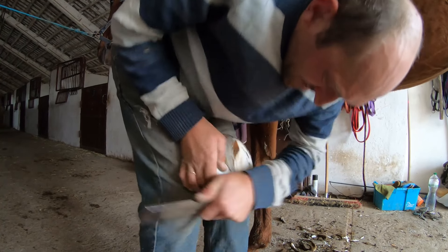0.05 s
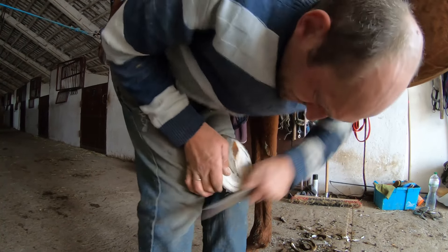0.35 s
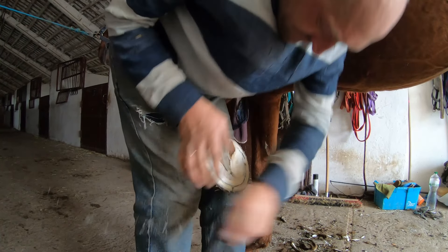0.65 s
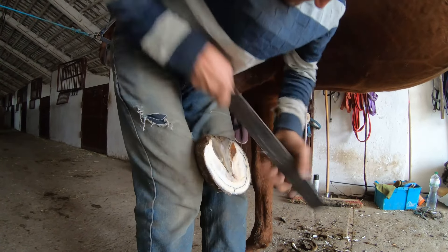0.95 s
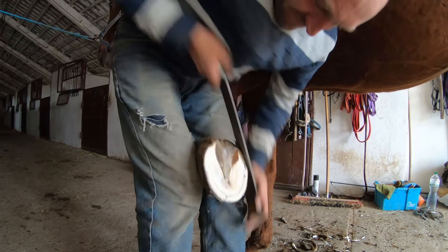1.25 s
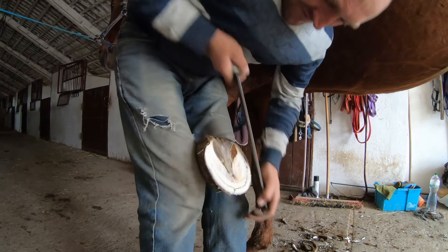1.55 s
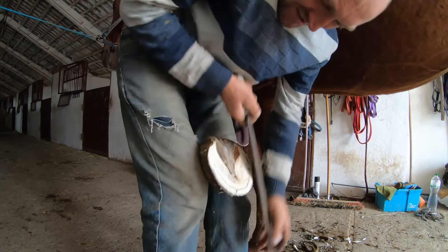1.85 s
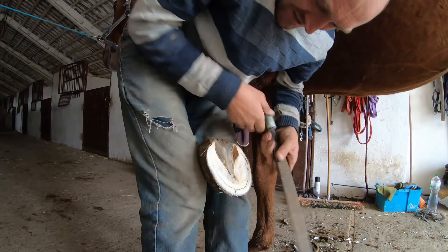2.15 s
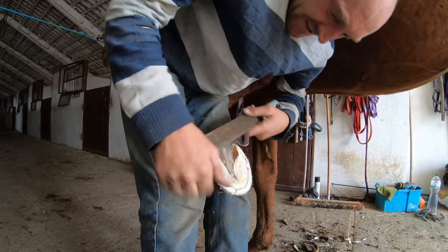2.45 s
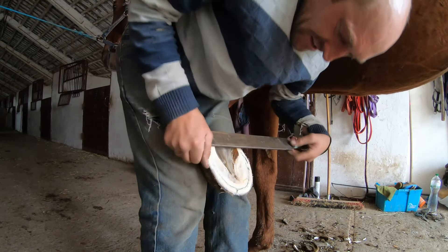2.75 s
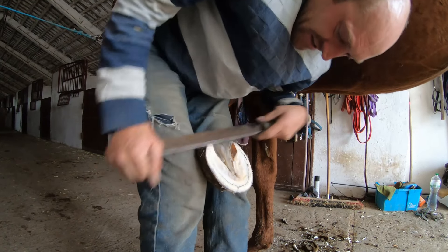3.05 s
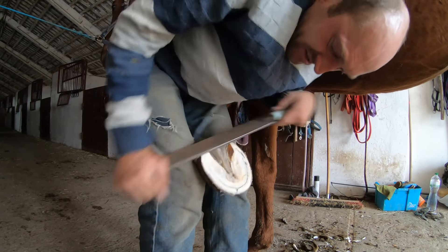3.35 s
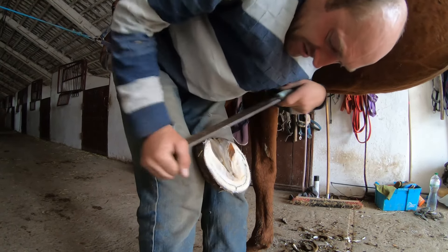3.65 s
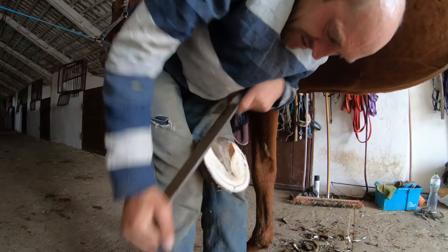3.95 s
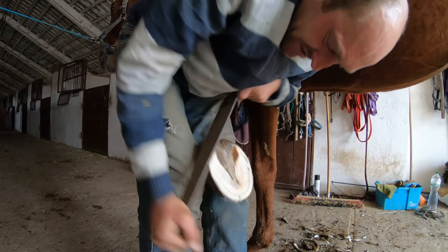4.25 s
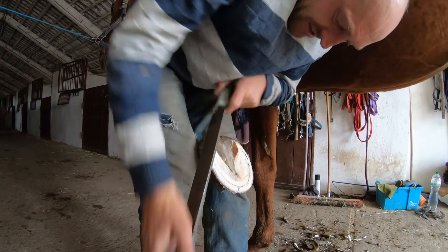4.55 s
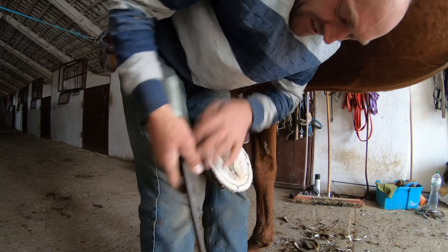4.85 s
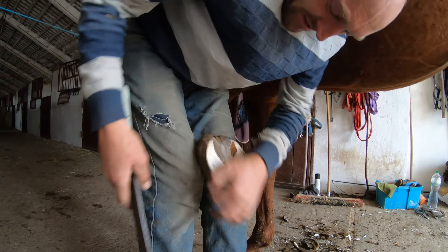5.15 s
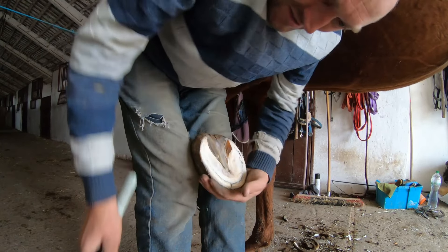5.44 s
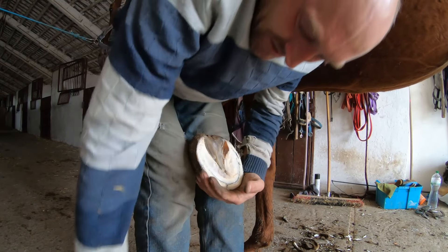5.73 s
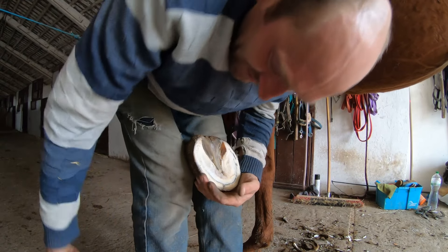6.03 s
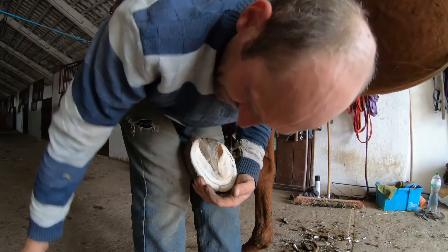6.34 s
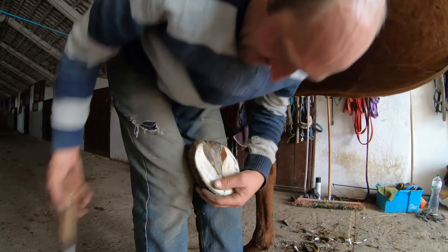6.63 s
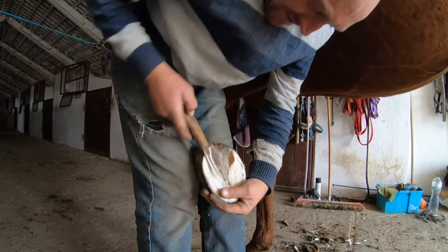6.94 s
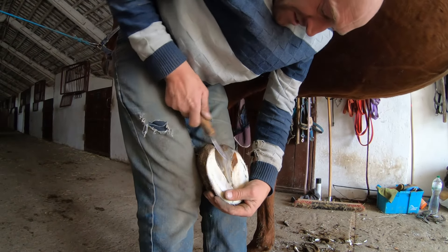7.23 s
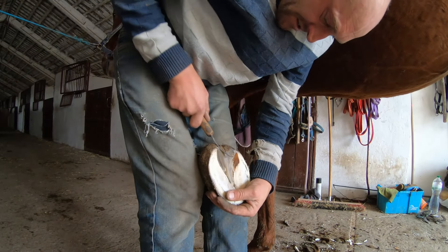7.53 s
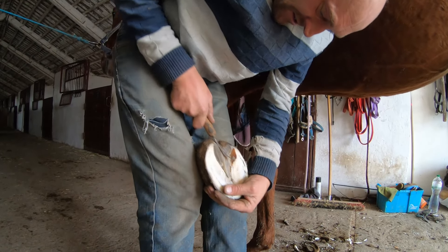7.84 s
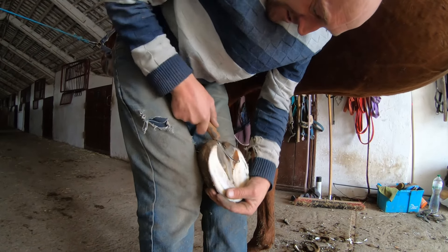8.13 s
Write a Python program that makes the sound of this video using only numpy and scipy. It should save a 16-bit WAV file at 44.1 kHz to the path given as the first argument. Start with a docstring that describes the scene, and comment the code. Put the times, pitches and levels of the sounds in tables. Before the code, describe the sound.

A steel rasp scrapes a horse's hoof in three quick, ringing, squeaky strokes, then in firmer, gritty ones with sharp hollow knocks. The strokes grow softer, with light glides between them. The rasp drops into a tool box with thuds and metallic clinks, a knife slides out, and faint paring cuts follow. The sounds are close, in a quiet stable with a short echo.

```python
"""Steel rasps a horse's hoof in a stable aisle: three one-handed strokes in which the blade sings and
snags, then six two-handed strokes that make the hoof drum, with light glides back between them.
The rasp clatters down among other tools, a hoof knife is drawn out and pares the sole in small cuts.
Teeth catch the horn and break off chips, which drive the resonances of blade and hoof;
hoof, box and tools ring in decaying modes when struck."""
import sys
import numpy as np
from scipy import signal
from scipy.fft import rfft, irfft
from scipy.io import wavfile
from scipy.ndimage import uniform_filter1d

SR = 44100
rng = np.random.default_rng(int(sys.argv[2]) if len(sys.argv) > 2 else 0)


def unload_audio(sound):
    """Save the sound as a 16-bit wav file, at the path given as the first command line argument."""
    columns = np.transpose(np.atleast_2d(sound))
    # keep every value between -1 and 1, then stretch to whole-number steps
    steps = np.round(np.clip(columns, -1, 1) * 32767)
    wavfile.write(sys.argv[1], SR, steps.astype(np.int16))


N = 361176
TIME = np.arange(N) / SR

# rasp blade resonances (frequency [Hz], width [Hz], level [dB])
RASP_MODES = [(903, 84, 4), (1366, 61, 17), (1766, 39, -0.5), (2260, 25, 3), (2932, 96, 4), (3638, 62, 0.5),
              (4240, 50, -7), (5110, 55, -2), (6100, 35, -10), (7120, 81, 0.5)]
# light contact on horn (frequency [Hz], level [dB])
RUB_SPECTRUM = [(200, -44), (600, -33), (1300, 3.5), (3700, -3.5), (8500, -9), (10300, -18.5),
                (13000, -24.5), (15500, -50)]
# stereo balance of blade, hoof and tool box (frequency [Hz], left minus right [dB])
BLADE_BALANCE = [(200, -.4), (1200, -7), (4500, -2), (8000, -7)]
HOOF_BALANCE = [(250, -.4), (1500, -3.2), (4200, 0), (8000, -7.5), (12000, -1.5)]
BOX_BALANCE = [(400, -.8), (1500, -2.5), (4500, 0), (8000, -4)]


def rasp():
    """Teeth chatter over the horn, shake the hoof and, held in one hand, set the blade singing."""
    # one-handed (start [s], swell [s], fade [s], scrape [dB], drum [dB], song [dB])
    loose_strokes = [(0.01, 0.07, 0.11, -37.5, -37.5, -34.5), (0.238, 0.046, 0.13, -40.5, -32.5, -31),
                     (0.424, 0.066, 0.12, -34.5, -37.5, -32.5)]
    # two-handed (start [s], swell [s], fade [s], scrape [dB], drum [dB], crunch [dB], chatter [Hz])
    firm_strokes = [(1.29, 0.094, 0.11, -34, -31.5, -34, 185.3),
                    (1.777, 0.052, 0.056, -29.5, -25.5, -32, 145.5),
                    (2.932, 0.1, 0.068, -34.5, -36, -36, 145.6), (3.396, 0.12, 0.06, -37, -40, -35, 122.4),
                    (3.785, 0.16, 0.061, -46.5, -39, -41.5, 235.4),
                    (4.369, 0.092, 0.087, -40, -47, -55, 269.4)]
    # scraping steel, drumming hoof, crunching horn (frequency [Hz], level [dB])
    scrape_spectrum = [(300, -14.5), (900, -5.5), (1500, -1.5), (3100, 4), (6300, -5), (8600, -7),
                       (10200, -20), (12500, -25), (15500, -46)]
    drum_spectrum = [(25, -15.5), (60, -9.5), (120, -5.5), (170, 3), (280, -2), (480, -10), (900, -11.5),
                     (2500, -91)]
    crunch_spectrum = [(150, -23.5), (450, -6), (660, 1), (1000, 1), (1400, 10.5), (1800, 2), (3000, 2),
                       (8000, -33)]
    loose_chatter_hz, speed_up_per_s = 240.0, 2.5
    scraping, drumming, singing, crunching = np.zeros((4, N))
    chatter_hz = np.full(N, loose_chatter_hz)
    for start, swell, fade, scrape_db, drum_db, song_db in loose_strokes:
        pressure = arch(start, swell, fade)
        scraping += gain_of(scrape_db) * pressure
        drumming += gain_of(drum_db) * pressure
        singing += gain_of(song_db) * pressure
    for start, swell, fade, scrape_db, drum_db, crunch_db, hz in firm_strokes:
        pressure = arch(start, swell, fade)
        scraping += gain_of(scrape_db) * pressure
        crunching += gain_of(crunch_db) * pressure
        drumming += gain_of(drum_db) * arch(start, swell, fade, lag=0.21)  # hardest late in the push
        quickening = np.exp(speed_up_per_s * np.minimum(TIME - start - swell, fade))
        chatter_hz = np.where(TIME < start, chatter_hz, hz * quickening)
    catches = teeth(rate_hz=chatter_hz, jitter=0.21, spread_db=2.5)
    chips, stray = grit(catches, burst_s=0.0036, drag=0.33, grain_db=6)
    bite = coloured(shifting(steel_ring(chips, ring_db=-15.5, t60_s=0.043), depth_db=4), scrape_spectrum)
    # the long blade's treble is unlike left and right
    side = coloured(coloured(stray, scrape_spectrum), [(1000, -5.5), (2500, -26), (5000, -8), (8500, 1.5)])
    scrape = np.array([steadied(bite + sign * side, samples=900) for sign in (1, -1)]) * scraping
    # each catch pushes the whole hoof
    push = unit_rms(catches - uniform_filter1d(catches, size=600)) + 0.5 * unit_rms(chips)
    shake = resonate(push, chatter_hz, width_hz=210)
    drum = steadied(coloured(shake, drum_spectrum), samples=1200) * drumming
    horn = steadied(coloured(shifting(chips, depth_db=5), crunch_spectrum), samples=900)
    drive = coloured(chips, scrape_spectrum)
    # neighbouring bar modes swing with opposite sign
    blade = steadied(sum((-1) ** k * gain_of(db) * unit_rms(resonate(drive, hz, width))
                         for k, (hz, width, db) in enumerate(RASP_MODES)))
    song = (gain_of(3) * blade + gain_of(-0.5) * horn) * singing
    hoof = gain_of(2) * scrape + drum + horn * crunching
    return placed(hoof, HOOF_BALANCE) + placed(song, BLADE_BALANCE)


def snags():
    """Teeth stick and slip in step with one blade resonance: a short, rough squeal."""
    # (start [s], length [s], level [dB], pitch [Hz])
    squeals = [(0.034, 0.016, -29.5, 1340), (0.101, 0.0039, -21.5, 1000), (0.302, 0.014, -22.5, 2920),
               (0.306, 0.037, -27, 1320), (0.355, 0.021, -25, 1270), (0.423, 0.03, -31.5, 1346),
               (0.445, 0.0056, -26.5, 3650), (0.481, .011, -17, 1400), (0.484, 0.083, -33.5, 2913),
               (0.512, 0.017, -26, 1315)]
    wavering_s = TIME + np.cumsum(0.0328 * wobble(samples=45)) / SR
    out = np.zeros(N)
    for start, length, db, hz in squeals:
        envelope = held(start, length, attack_s=0.0048, release_s=0.007, growth_db=-1.5)
        out += gain_of(db) * envelope * np.sin(2 * np.pi * hz * wavering_s)
    return placed(out * gain_of(1.75 * wobble(samples=80)), BLADE_BALANCE)


def glides():
    """Teeth skim back over the horn: a dull scrape and one blade note that grows with pressure."""
    # (start [s], length [s], level [dB], note [Hz])
    returns = [(1.91, 0.18, -56, 1880), (2.24, 0.37, -67, 1960), (3.14, 0.33, -57.5, 1765),
               (3.57, 0.086, -59, 3702), (4.13, 0.21, -65.5, 1393), (4.54, 0.1, -58.5, 1310),
               (4.68, 0.42, -61.5, 1330)]
    spectrum = [(200, -5), (750, 5.5), (1100, -10.5), (1500, 1.5), (3600, -2.5), (9000, -20), (14000, -50)]
    catches = teeth(rate_hz=270, jitter=0.43, spread_db=3.5)
    chips = grit(catches, burst_s=0.0028, drag=1, grain_db=2.5)[0]
    skim = steadied(coloured(chips, spectrum))
    pressure, note_hz = np.zeros(N), np.full(N, float(returns[0][3]))
    for start, length, db, hz in returns:
        pressure += gain_of(db) * held(start, length, attack_s=0.012, release_s=0.027, growth_db=3.5)
        note_hz[TIME >= start] = hz
    ring = steadied(resonate(skim, note_hz * np.exp(0.019 * wobble(samples=3000)), width_hz=71))
    ring *= np.sqrt(pressure / pressure.max())
    return placed((gain_of(-3) * skim + gain_of(-4) * ring) * pressure, HOOF_BALANCE)


def knocks():
    """Steel hits the hoof: a dry crack and a short hollow thud."""
    # (time [s], thud [dB], crack [dB])
    hits = [(0.264, -22, -9), (0.8, -29, -39), (1.27, -23, -14), (1.444, -14, -4.5), (1.454, -11, -2.5),
            (1.725, -24, -17), (1.804, -18, -8.5), (2.957, -36, -20), (4, -37, -23), (4.311, -30.5, -29),
            (5.008, -36, -34), (6.983, -67, -30.5), (7.084, -46, -40), (7.343, -50, -23)]
    # (frequency [Hz], level [dB], t60 [s])
    hoof_modes = [(161, -7, 0.1), (238, 0.5, 0.048), (313, -9, 0.068)]
    spectrum = [(100, -17), (600, 19), (1100, 13.5), (2600, 6.5), (8500, -8.5), (15000, -36)]
    out, t = np.zeros(N), np.arange(SR // 4) / SR
    for start, thud_db, crack_db in hits:
        add(out, start, gain_of(thud_db - 7) * struck(hoof_modes, t, rise_s=0.00265))
        add(out, start, gain_of(crack_db - 12.5) * crack(t, spectrum, decay_s=0.0059))
    return placed(out, HOOF_BALANCE)


def taps():
    """The rasp touches the horn as it is turned: a tick and a faint ring."""
    # (time [s], level [dB])
    touches = [(0.92, -50), (1.683, -52), (2.146, -50), (2.545, -55), (2.586, -52), (2.627, -60.5),
               (3.758, -58.5)]
    out, t = np.zeros(N), np.arange(SR // 8) / SR
    for start, db in touches:
        add(out, start, gain_of(db) * crack(t, RUB_SPECTRUM, decay_s=0.0026))
    return placed(touched(out, ring_db=18), HOOF_BALANCE)


def tool_box():
    """The rasp drops into the box, one end then the other; the contents rumble after each blow."""
    # (time [s], thud [dB], crack [dB])
    blows = [(5.868, -14, -22), (5.893, -7, -17.5), (5.926, -17, -30), (6.005, -11, -16),
             (6.15, -12.5, -25.5), (6.222, -32, -35), (6.344, -29.5, -33.5)]
    # (frequency [Hz], level [dB], t60 [s])
    box_modes = [(181.6, 0, 0.13), (213, -0.5, 0.02), (266, -3, 0.086), (346, 1.5, 0.085),
                 (400, 2.5, 0.029), (508, -2.5, 0.05)]
    # shaken contents (frequency [Hz], level [dB])
    rumble_spectrum = [(25, -37), (60, 0.5), (110, -12.5), (220, 1.5), (400, 0), (1100, -49), (4000, -85)]
    crack_spectrum = [(100, -15.5), (500, 17.5), (1100, 7), (2000, -2), (8500, -17), (14000, -64)]
    bounce_s, bounce_db = 0.00842, -7
    out, t = np.zeros(N), np.arange(SR // 2) / SR
    settling = np.exp(-t / 0.092) * np.clip(t / 0.023, 0, 1)
    for start, thud_db, crack_db in blows:
        rumble = steadied(coloured(rng.standard_normal(len(t)), rumble_spectrum)) * settling
        add(out, start, gain_of(thud_db - 21) * rumble)
        add(out, start, gain_of(crack_db) * crack(t, crack_spectrum, decay_s=0.02))
        for delay_s, contact_db in ((0, 0), (bounce_s, bounce_db)):
            # each contact meets another spot of the box
            spot = [(hz * np.exp(0.067 * rng.standard_normal()), db, t60) for hz, db, t60 in box_modes]
            add(out, start + delay_s, gain_of(thud_db + contact_db) * struck(spot, t, rise_s=0.00326))
    return placed(out, BOX_BALANCE)


def knife_draw():
    """The knife slides out, catching on the other tools."""
    # (start [s], length [s], level [dB])
    slides = [(6.393, 0.053, -38.5), (6.435, 0.019, -39), (6.458, 0.03, -38), (6.524, 0.0068, -47)]
    # sliding steel (frequency [Hz], level [dB])
    spectrum = [(150, -36), (330, 13.5), (600, 4), (3900, -4), (4500, -34), (8200, -8), (14000, -75)]
    catches = teeth(rate_hz=290, jitter=0.52, spread_db=4)
    friction = grit(catches, burst_s=0.0042, drag=0.68, grain_db=0)[0]
    scrape = gain_of(-6.5) * steadied(coloured(friction, spectrum)) + gain_of(-1) * knife_ring(friction)
    envelope = sum(gain_of(db) * held(start, length, attack_s=0.023, release_s=0.018, growth_db=0)
                   for start, length, db in slides)
    return placed(scrape * envelope, BOX_BALANCE)


def clinks():
    """Steel tools ring at a touch; brief chatter feeds the ring and wakes higher modes."""
    # (time [s], level [dB], centre of favoured modes [Hz])
    contacts = [(2.162, -46.5, 2170), (5.896, -31, 3400), (5.909, -34, 4560), (6.035, -38.5, 3100),
                (6.043, -44.5, 5100), (6.163, -40.5, 5700)]
    # (frequency [Hz], level [dB], t60 [s])
    tool_modes = [(2229, -4, 0.14), (2990, 3, 0.12), (3130, -3.5, 0.12), (3540, -1, 0.076),
                  (4690, 13.5, 0.1), (4815, 4.5, 0.13), (6200, -8, 0.25), (6430, 1.5, 0.23),
                  (7130, 2, 0.24), (8400, 1, 0.16)]
    out, rattle = np.zeros((2, N))
    t = np.arange(SR // 2) / SR
    for start, db, centre_hz in contacts:
        modes = [(hz, mode_db + rng.normal(0, 2.5) - 26 * min(abs(np.log2(hz / centre_hz)), 1), t60)
                 for hz, mode_db, t60 in tool_modes]
        chatter = crack(t, [(800, -12), (3000, -0.5), (8500, -8), (14000, -37)], decay_s=0.042)
        ring = struck(modes, t, rise_s=0.0039)
        fed_ring = signal.fftconvolve(chatter, ring)[:len(t)]
        add(out, start, gain_of(db) * (ring + gain_of(-7.5) * fed_ring / abs(fed_ring).max()))
        add(rattle, start, gain_of(db) * chatter)
    return placed(out + gain_of(-9) * steel_ring(rattle, ring_db=-1.5, t60_s=0.11), BOX_BALANCE)


def paring(rub, flakes):
    """The knife rubs through the sole; breaking flakes make it ring and squeak."""
    # (time [s], swell [s], level [dB], blade note [Hz])
    cuts = [(6.76, 0.21, -61.5, 5550), (7.02, 0.096, -56.5, 3750), (7.16, 0.13, -56, 6340),
            (7.57, 0.13, -64, 3820), (7.745, 0.062, -53.5, 2480), (7.89, 0.11, -61.5, 3870),
            (8.1, 0.078, -52.5, 3830)]
    pressure, note_hz = np.zeros(N), np.full(N, float(cuts[0][3]))
    for time_s, swell_s, db, hz in cuts:
        pressure += gain_of(db) * arch(time_s - swell_s / 3, swell_s, fade_s=0.63 * swell_s)
        note_hz[TIME >= time_s] = hz
    squeak = steadied(resonate(resonate(flakes, note_hz, width_hz=220), note_hz, width_hz=200))
    return (gain_of(-2) * rub + gain_of(-11) * knife_ring(flakes) + gain_of(-8.5) * squeak) * pressure


def brushing(rub, hiss, flakes):
    """Hands, sleeves and rasp brush over horn and cloth, with small ticks."""
    # (start [s], length [s], level [dB], relative hiss [dB])
    moves = [(0.598, 0.62, -64.5, 1.5), (2.107, 0.083, -63, 1.5), (2.665, 0.21, -67, 2.5),
             (2.893, 0.02, -55, -5), (3.789, 0.2, -49.5, -20), (4.804, 0.068, -59.5, -7),
             (4.98, 0.19, -57, -25), (5.13, 0.18, -53, -5.5), (5.455, 0.29, -63, -5.5)]
    rubbing, hissing = np.zeros((2, N))
    for start, length, db, hiss_db in moves:
        gain = gain_of(db) * held(start, length, attack_s=0.22 * length, release_s=0.019, growth_db=-0.5)
        rubbing += gain
        hissing += gain * gain_of(hiss_db)
    ticks = gain_of(-6.5) * unit_rms(touched(coloured(flakes, RUB_SPECTRUM), ring_db=13))
    return ((rub + ticks) * rubbing + hiss * hissing) * gain_of(2.76 * wobble(samples=800))


def light_friction():
    """Textures of light contact: fine rub on horn, hiss of cloth, sparse flakes."""
    cloth_spectrum = [(1500, -8.5), (3500, 4.5), (8500, 3.5), (10300, -12), (15500, -21)]
    chips = grit(teeth(rate_hz=190, jitter=1, spread_db=-1), burst_s=0.0049, drag=2.5, grain_db=-3.5)
    rub = diffuse(np.array([steadied(coloured(x, RUB_SPECTRUM)) for x in chips]))
    hiss = diffuse_noise(cloth_spectrum)
    flakes = grit(teeth(rate_hz=90, jitter=0.81, spread_db=11), burst_s=0.0023, drag=0.32, grain_db=1.5)
    return rub, hiss, flakes[0]


def shuffling():
    """Horse and farrier shift their weight: low, lumpy noise."""
    # (start [s], length [s], level [dB])
    shifts = [(0.772, 0.12, -45.5), (0.915, 0.52, -57), (1.482, 0.061, -62), (3.096, 0.3, -56.5),
              (4.106, 0.082, -52.5), (4.541, 0.19, -52.5), (5.127, 0.074, -49), (5.33, 0.32, -56.5),
              (6.817, 0.43, -59), (7.607, 0.41, -58)]
    # dull thumps (frequency [Hz], level [dB])
    spectrum = [(30, -5), (100, -44), (160, 3), (245, 2.5), (400, -24.5), (9000, -78)]
    envelope = sum(gain_of(db) * held(start, length, attack_s=0.017, release_s=0.049, growth_db=-2)
                   for start, length, db in shifts)
    thumps = steadied(coloured(rng.standard_normal(N), spectrum), samples=3500)
    return thumps * gain_of(1.35 * wobble(samples=1800)) * envelope


def stable(x, early_db, early_s, tail_db):
    """The aisle's tail, plus quick reflections off floor and legs that shift as the farrier moves."""
    # (frequency [Hz], t60 [s])
    decay_times = [(200, 0.4), (530, 0.41), (1400, 0.4), (3700, 0.29), (9000, 0.35)]
    t, mono = np.arange(SR) / SR, x.mean(0)[None]
    hz, frame_s, bands = signal.stft(diffuse(rng.standard_normal((2, SR))), SR, nperseg=256)
    decay = np.exp(-np.log(1000) * frame_s / lookup(decay_times, hz)[:, None])
    tail = signal.istft(bands * decay, SR)[1][:, :SR] * np.clip(t / 0.017, 0, 1)
    out = gain_of(tail_db) * signal.oaconvolve(mono, tail / np.linalg.norm(tail[0]), axes=1)[:, :N]
    t = t[:SR // 20]
    bass_cut = signal.butter(2, 700, "high", fs=SR, output="sos")  # small surfaces return no bass
    for share in (np.cos(2 * np.pi * TIME), np.sin(2 * np.pi * TIME)):
        echoes = rng.standard_normal((2, len(t))) * (rng.random((2, len(t))) < 0.05)
        early = signal.sosfilt(bass_cut, echoes * np.exp(-t / early_s) * (t > 0.001))
        early /= np.linalg.norm(early[0])
        out += gain_of(early_db) * signal.oaconvolve(mono * share, early, axes=1)[:, :N]
    return out


def air():
    """Quiet, steady background of the stable."""
    # (frequency [Hz], level [dB])
    spectrum = [(25, -22), (57, -1.5), (109, -14.5), (230, 1), (430, -18), (750, -9.5), (1300, -21.5),
                (3700, -20.5), (5500, -30.5), (8500, -25.5), (11000, -50.5), (15000, -54)]
    return gain_of(-61.5) * diffuse_noise(spectrum)


def teeth(rate_hz, jitter, spread_db):
    """Impulses of teeth catching at an uneven pace, with uneven force."""
    pace_hz = rate_hz * np.exp(jitter * wobble(samples=300))
    catches = np.diff(np.floor(np.cumsum(pace_hz) / SR), prepend=0)
    return catches * gain_of(spread_db * np.clip(rng.standard_normal(N), -2, 2))


def grit(catches, burst_s, drag, grain_db):
    """Each catch breaks off a burst of chips over the even drag of the other teeth; two sets."""
    bursts = signal.lfilter([1], [1, -np.exp(-1 / (burst_s * SR))], catches)
    chips = rng.standard_normal((2, N)) * gain_of(grain_db * np.clip(rng.standard_normal((2, N)), -2, 2))
    return chips * (drag + unit_rms(bursts))


def steel_ring(x, ring_db, t60_s, count=60):
    """Adds a blade's high modes; which ones speak shifts as the contact slides."""
    t = np.arange(SR // 8) / SR
    out = x
    for share in (np.cos(np.pi * TIME), np.sin(np.pi * TIME)):
        offset, phase = rng.random((2, count, 1))
        hz = 2300 + 11000 * (np.arange(count)[:, None] + offset) / count
        ring = np.cos(2 * np.pi * (hz * t + phase)).sum(0) * np.exp(-np.log(1000) * t / t60_s)
        out = out + gain_of(ring_db) * signal.oaconvolve(x * share, ring / np.linalg.norm(ring))[:N]
    return out


def knife_ring(x):
    """The knife's thin blade rings under a scrape."""
    # (frequency [Hz], width [Hz], level [dB])
    knife_modes = [(1067, 60, -1.5), (1765, 20, -3), (2065, 430, 4), (2686, 36, -2.5), (3165, 87, 3.5),
                   (4200, 22, -1), (5470, 26, -8.5)]
    drive = signal.sosfilt(signal.butter(4, 7500, fs=SR, output="sos"), x)
    return steadied(sum(gain_of(db) * unit_rms(resonate(drive, hz, width)) for hz, width, db in knife_modes))


def touched(x, ring_db):
    """Light contact rings the rasp's upper modes; the hands damp the lowest two."""
    ring = sum(signal.lfilter(*signal.iirpeak(hz, hz / width, fs=SR), x) for hz, width, _ in RASP_MODES[2:])
    return x + gain_of(ring_db) * ring


def shifting(x, depth_db):
    """Broad resonances come and go as the contact slides along blade and hoof."""
    bands = signal.stft(x, nperseg=512)[2]
    patches = uniform_filter1d(rng.standard_normal(bands.shape), size=5, axis=0)
    patches = uniform_filter1d(patches, size=7, axis=1)
    return signal.istft(bands * gain_of(depth_db * unit_rms(patches)))[1][:N]


def struck(modes, t, rise_s):
    """Decaying modes that build up over the contact time; peak 1."""
    ring = sum(gain_of(db) * np.exp(-np.log(1000) * t / t60) * np.sin(2 * np.pi * hz * (t - 2 * rise_s))
               for hz, db, t60 in modes)
    ring *= 1 - np.exp(-(t / rise_s) ** 2)
    return ring / abs(ring).max()


def crack(t, spectrum, decay_s):
    """Sharp contact with a short spray of noise; peak 1."""
    spray = rng.standard_normal(len(t)) * np.exp(-t / decay_s)
    spray[0] += 4
    sound = coloured(spray, spectrum)
    return sound / abs(sound).max()


def arch(start_s, swell_s, fade_s, lag=0):
    """Stroke pressure: swells to a rounded top, eases off; lag delays it by a share of the swell."""
    depth_db, roundness = 20.5, 1.59
    from_top_s = TIME - start_s - swell_s * (1 + lag)
    distance = np.maximum(-from_top_s / swell_s, from_top_s / fade_s)
    return gain_of(-depth_db * np.minimum(distance, 4) ** roundness)


def held(start_s, length_s, attack_s, release_s, growth_db):
    """Envelope: attack, a hold that grows or sags, release."""
    t = TIME - start_s
    hold = gain_of(growth_db * np.clip(t / length_s, 0, 1))
    return np.clip(t / attack_s, 0, 1) * hold * np.exp(-np.clip((t - length_s) / release_s, 0, 20))


def resonate(x, hz, width_hz):
    """Resonance whose centre may move."""
    carrier = np.exp(2j * np.pi * np.cumsum(hz * np.ones(N)) / SR)
    pole = np.exp(-np.pi * width_hz / SR)
    return (carrier * signal.lfilter([1 - pole], [1, -pole], x / carrier)).real


def coloured(x, spectrum, size=4096):
    """Causal filter from (frequency [Hz], gain [dB]) points."""
    log_gain = np.log(gain_of(lookup(spectrum, abs(np.fft.fftfreq(size, 1 / SR)))))
    kernel = np.fft.ifft(np.exp(np.conj(signal.hilbert(log_gain)))).real[:size // 2]
    return signal.oaconvolve(x, kernel)[:len(x)]


def placed(x, balance):
    """Pans by frequency."""
    half_db = lookup(balance, np.fft.rfftfreq(N, 1 / SR)) / 2
    gains = gain_of([half_db, -half_db])
    return irfft(rfft(x) * gains / gains.mean(0), N)


def diffuse(pair):
    """Makes two unrelated channels partly alike, most in the bass."""
    # (frequency [Hz], left-right coherence [0-1])
    coherence = [(200, 0.66), (600, 0.15), (1500, 0.46), (6000, 0.44)]
    left, other = rfft(pair)
    alike = lookup(coherence, np.fft.rfftfreq(pair.shape[1], 1 / SR))
    return irfft(np.array([left, alike * left + np.sqrt(1 - alike ** 2) * other]), pair.shape[1])


def diffuse_noise(spectrum):
    """Coloured stereo noise."""
    return diffuse(np.array([unit_rms(coloured(x, spectrum)) for x in rng.standard_normal((2, N))]))


def wobble(samples):
    """Smooth random drift, rms 1."""
    return unit_rms(uniform_filter1d(uniform_filter1d(rng.standard_normal(N), samples), samples))


def steadied(x, samples=1800):
    """Holds short-term rms at 1; keeps the fine grain."""
    return x / np.sqrt(abs(uniform_filter1d(x ** 2, samples)) + 1e-20)


def unit_rms(x):
    """Scales to rms 1."""
    return x / np.sqrt(np.mean(x ** 2) + 1e-20)


def gain_of(db):
    """Decibels to amplitude."""
    return 10 ** (np.asarray(db) / 20)


def lookup(points, hz):
    """Interpolates over log frequency."""
    point_hz, value = np.transpose(points)
    return np.interp(np.log(hz + 1), np.log(point_hz + 1), value)


def add(mix, start_s, sound):
    """Mixes a sound in."""
    part = mix[max(round(start_s * SR), 0):][:len(sound)]
    part += sound[:len(part)]


def scene():
    """The farrier's work and the stable around it."""
    near = rasp() + snags() + glides() + knocks() + taps() + tool_box() + knife_draw() + clinks()
    rub, hiss, flakes = light_friction()
    near += paring(rub, flakes) + shuffling() + brushing(rub, hiss, flakes)
    return near + stable(near, early_db=-4.5, early_s=0.0022, tail_db=-11.5) + air()


def record(dry):
    """Steep low-pass on the top treble."""
    cutoff_hz = 15750
    low_pass = signal.firwin(511, cutoff_hz, window=("kaiser", 9), fs=SR)
    return signal.oaconvolve(dry, low_pass[None], "same")


dry = scene()
out = record(dry)
unload_audio(out)
```